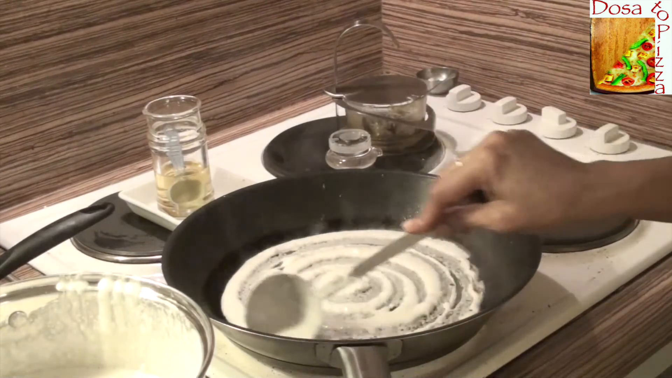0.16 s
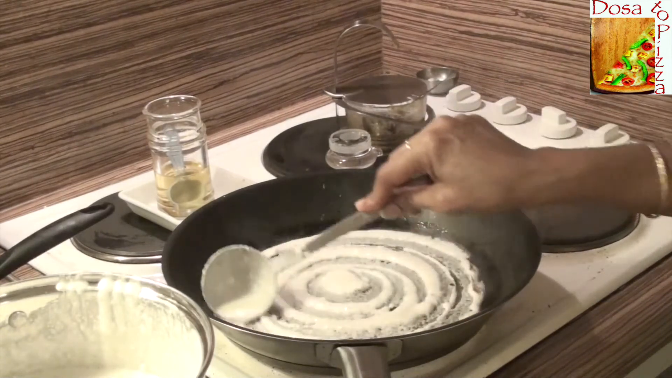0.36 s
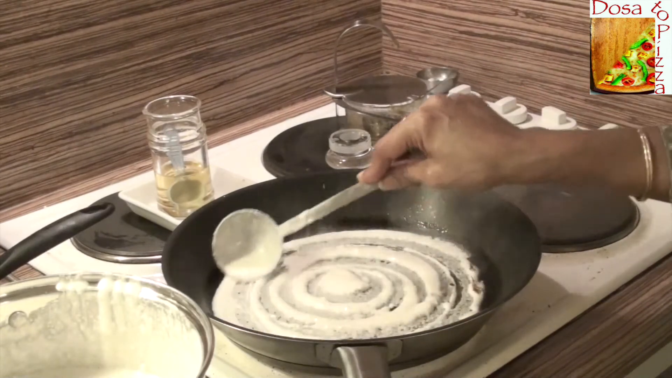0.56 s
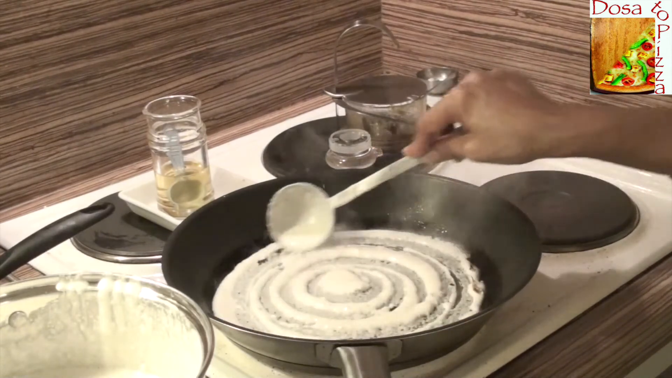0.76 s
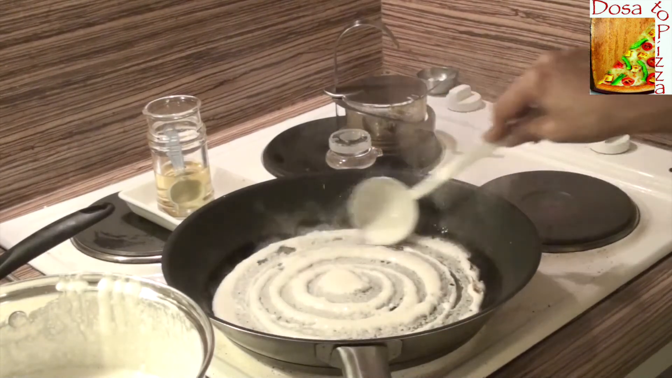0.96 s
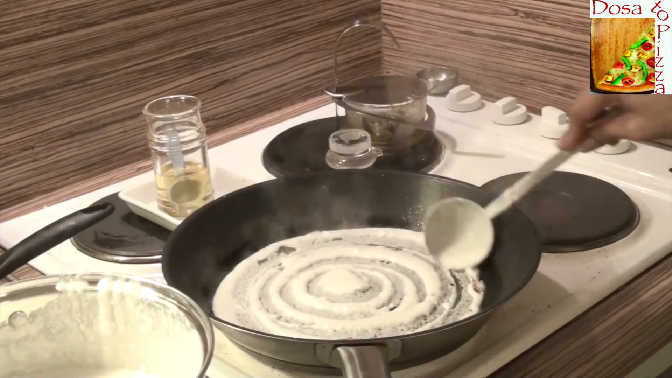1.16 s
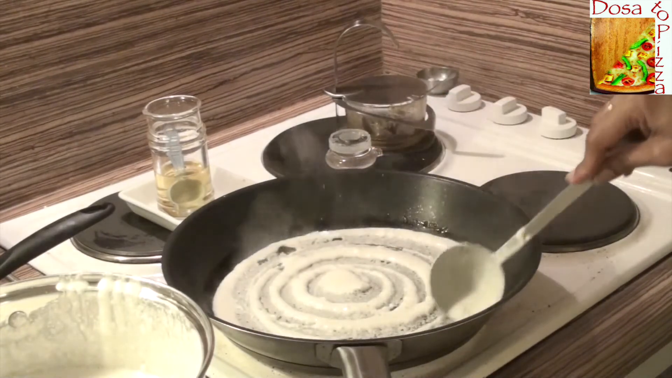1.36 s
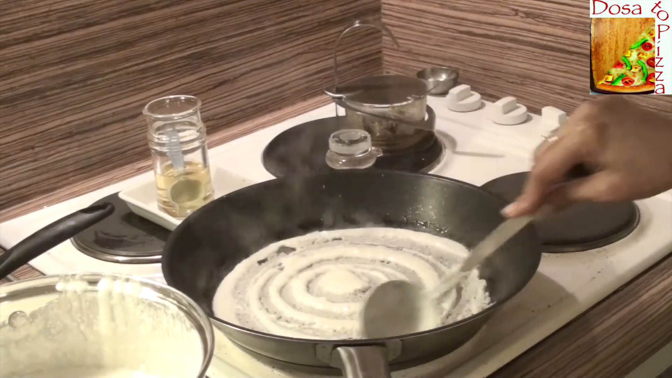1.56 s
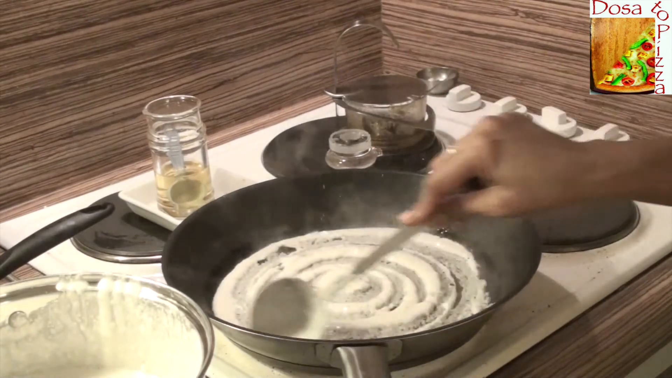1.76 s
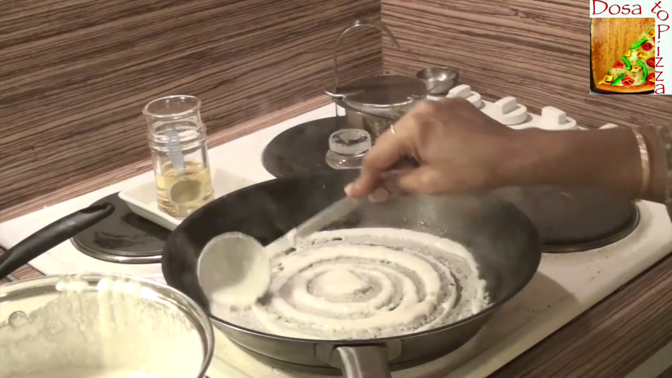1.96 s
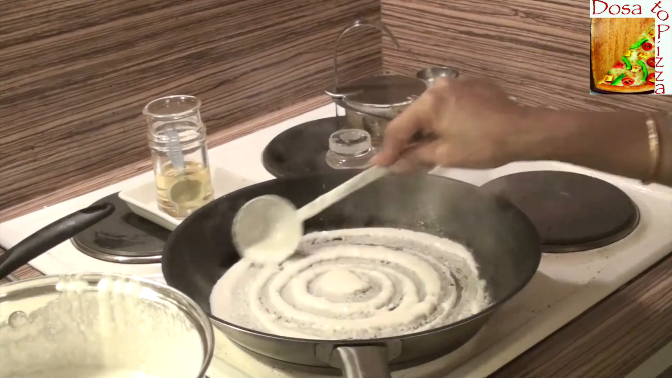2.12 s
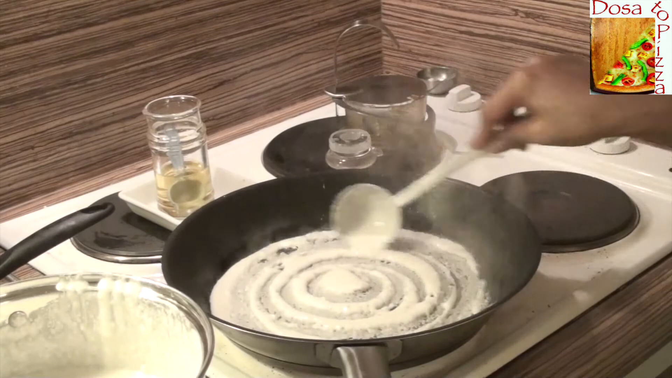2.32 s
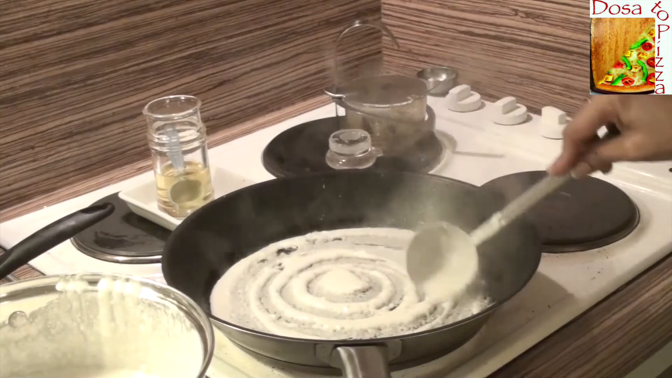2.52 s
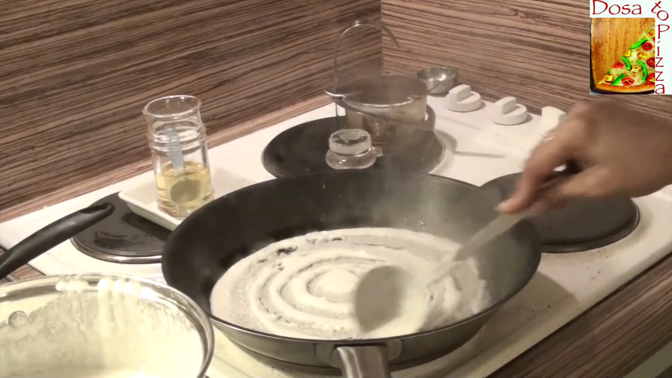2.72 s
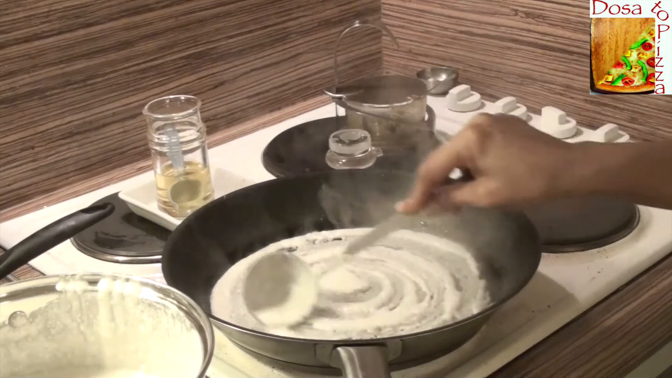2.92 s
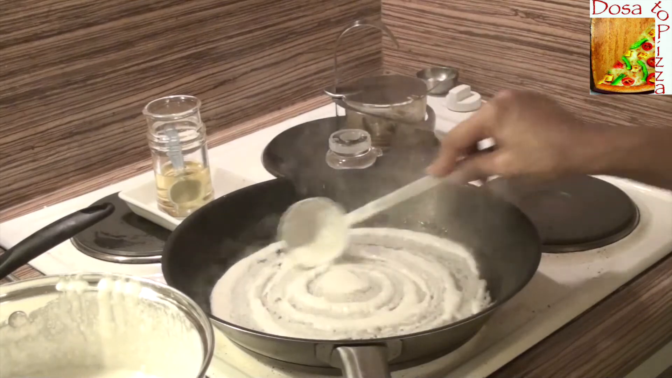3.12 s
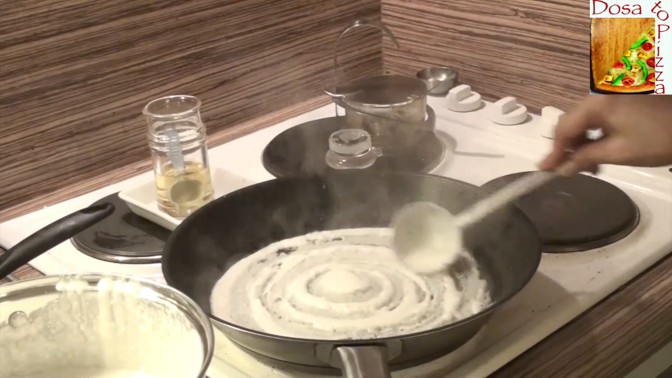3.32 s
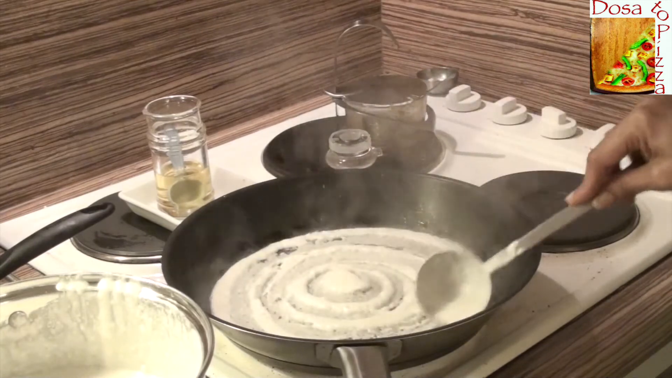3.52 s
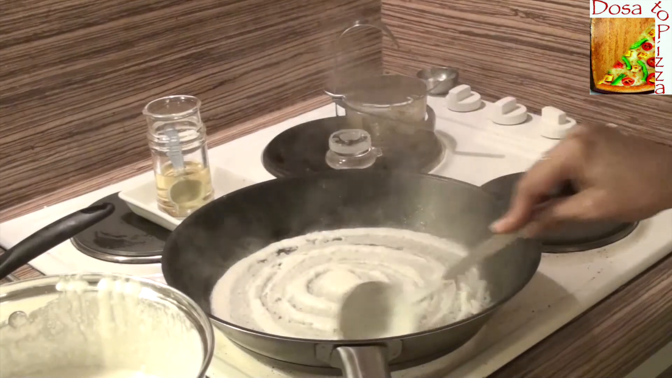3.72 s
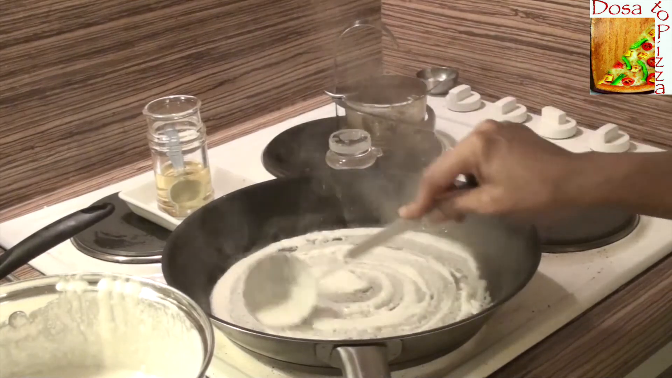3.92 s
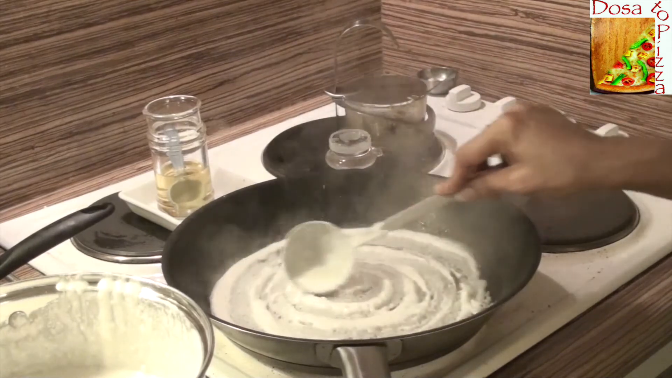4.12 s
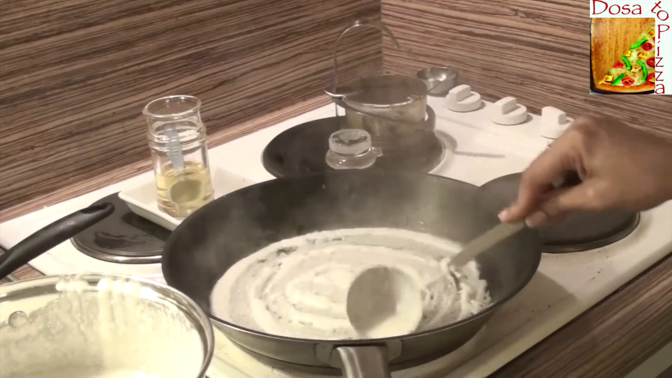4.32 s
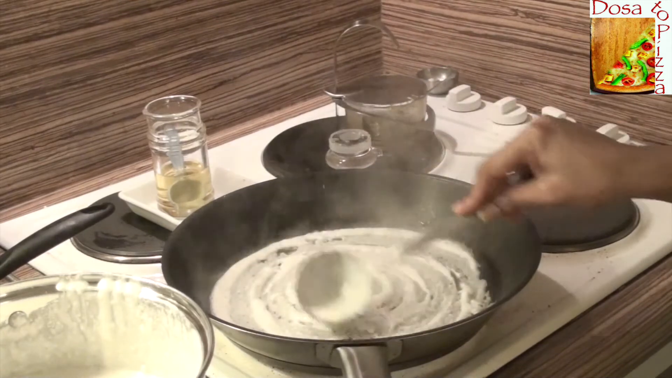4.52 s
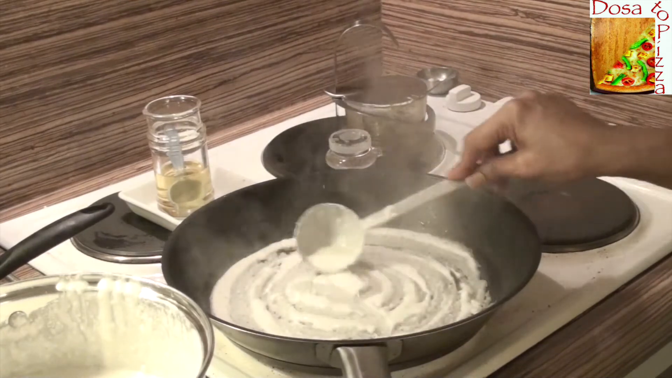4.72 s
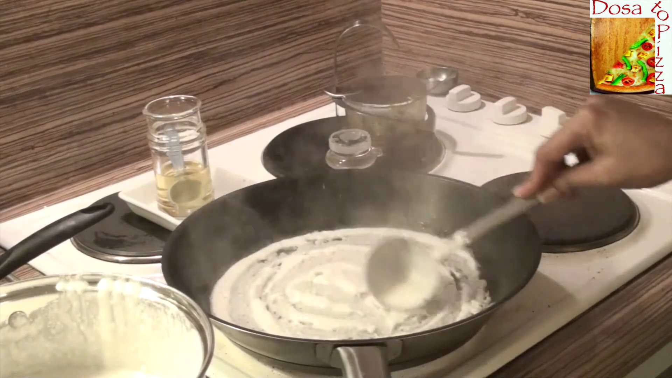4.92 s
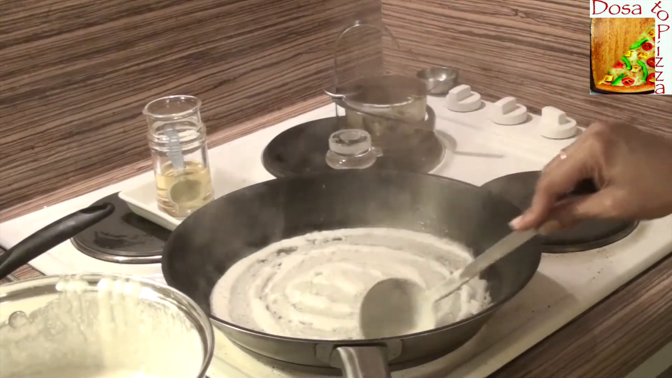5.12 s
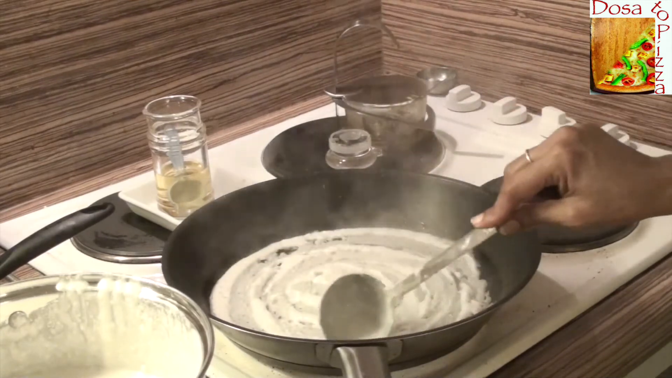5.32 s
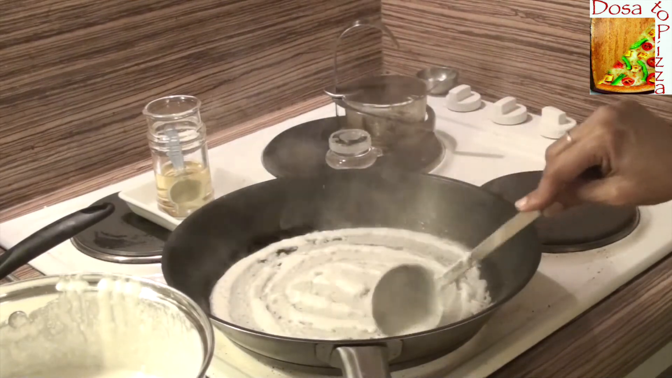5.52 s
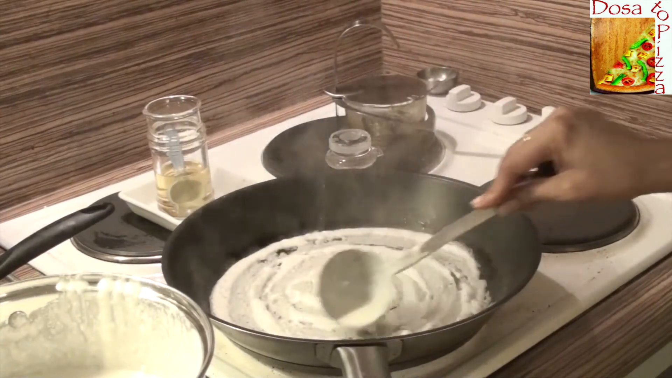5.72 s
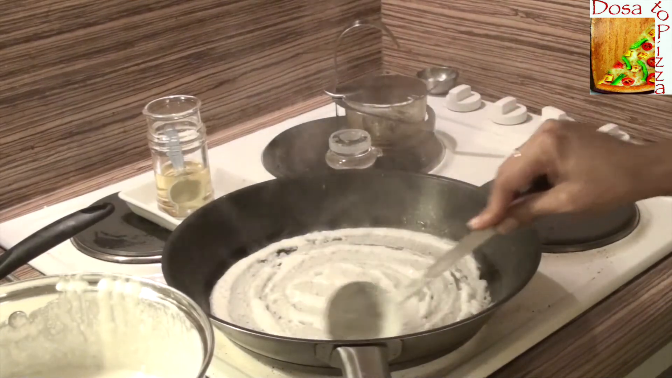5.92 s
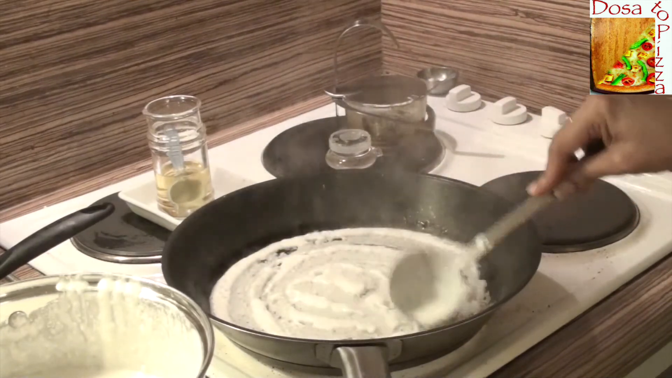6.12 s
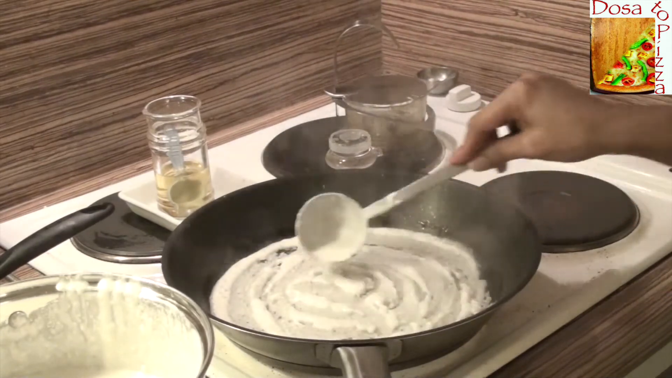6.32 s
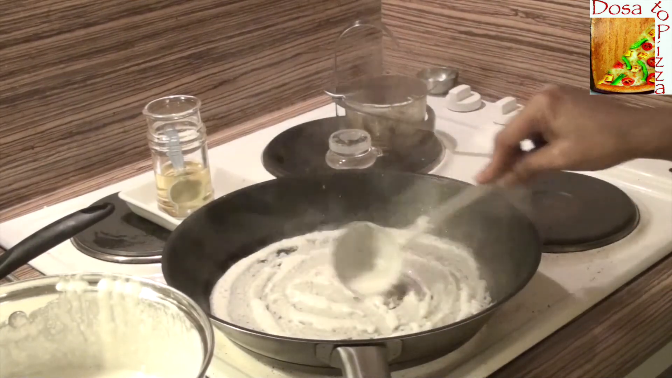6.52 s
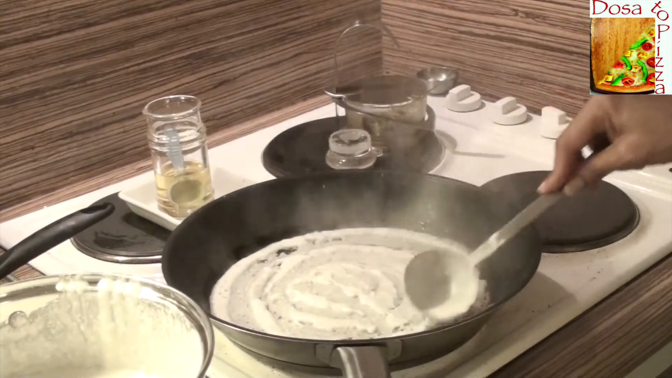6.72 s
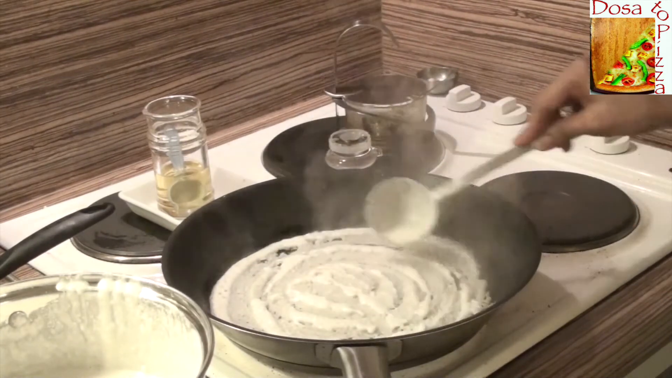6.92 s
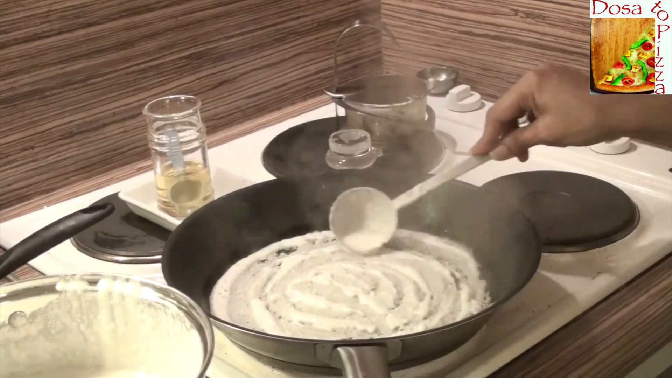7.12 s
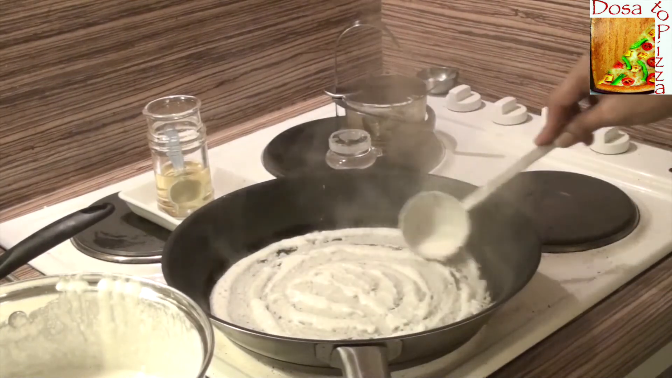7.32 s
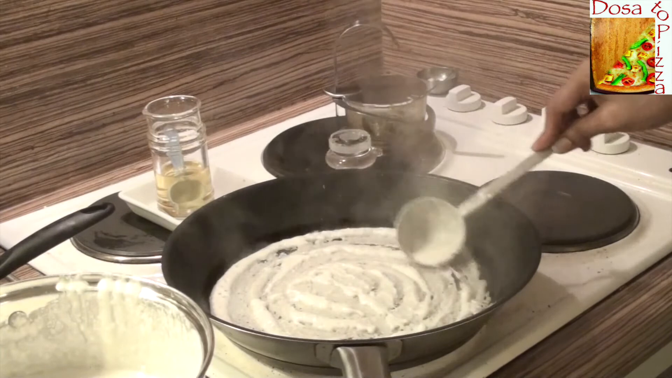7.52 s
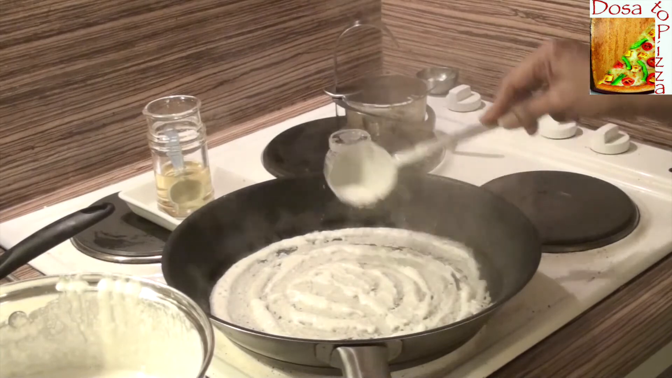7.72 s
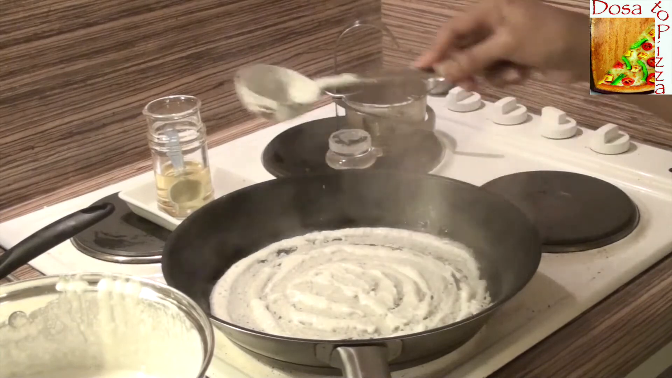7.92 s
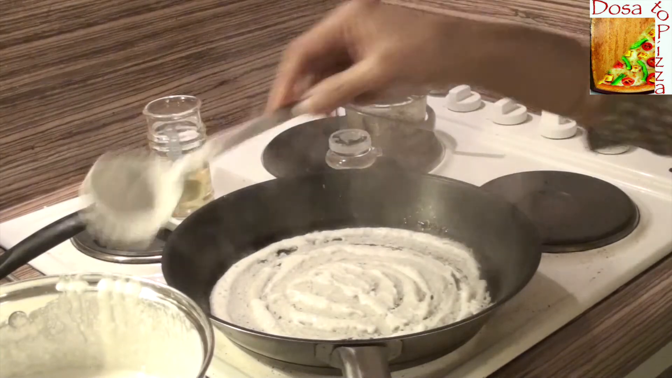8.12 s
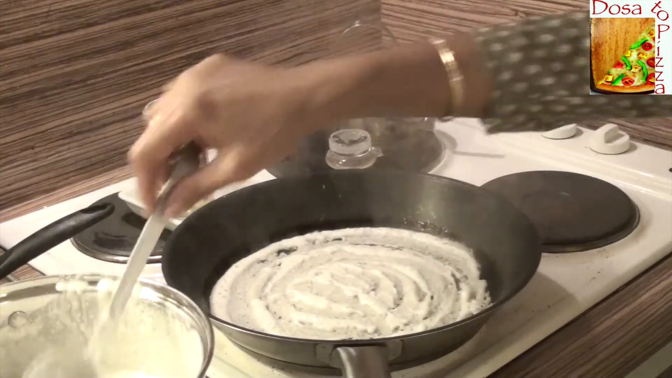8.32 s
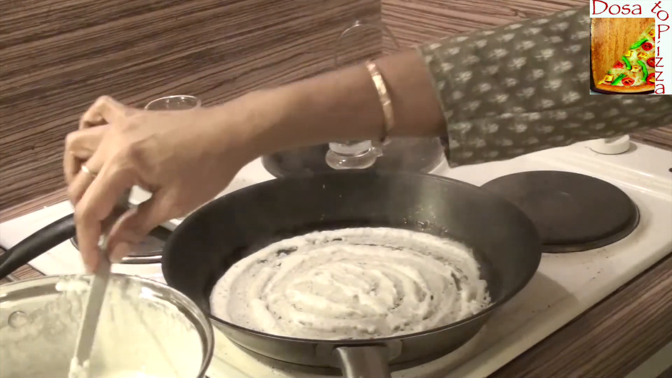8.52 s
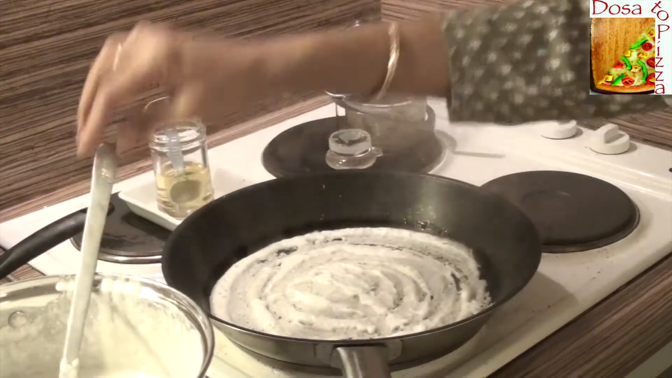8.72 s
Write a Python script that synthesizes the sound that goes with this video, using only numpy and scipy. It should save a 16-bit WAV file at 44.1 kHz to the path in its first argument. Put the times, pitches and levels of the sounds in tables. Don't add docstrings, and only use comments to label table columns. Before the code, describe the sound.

From 0 seconds, thin batter on a hot pan gives a dense, bright, steady hiss of bursting steam bubbles, heard close and central in a small kitchen. It stays strong until about 2.5 seconds, when it begins to drop and clear snapping spits emerge; an especially sharp pop comes at about 3.1, another strong one near 3.9. By 5 seconds the hiss is much thinner, flickering, with frequent crisp pops, short splutters and tiny droplet ticks. From 6.5 to 8.5 it is a faint, dry crackle with small spits. Low air rumble, a very quiet motor hum and fan tone lie beneath, with occasional soft, dull counter thumps, including near 2.25 and 6. At about 8.65 a ladle clanks brightly against a steel bowl slightly left, followed by three quick, weaker rattles and a short metallic ring.

```python
import sys
import numpy as np
from scipy import signal
from scipy.fft import rfft, irfft, next_fast_len
from scipy.io import wavfile
from scipy.ndimage import uniform_filter1d, map_coordinates

SR = 44100
rng = np.random.default_rng(int(sys.argv[2]) if len(sys.argv) > 2 else 0)


def to_wav(sig):
    pcm = np.clip(np.atleast_2d(sig), -1, 1) * 32767
    pcm = np.round(pcm).astype(np.int16)
    wavfile.write(sys.argv[1], SR, pcm.T)


def makeup_ratio(level_db):
    decades = np.asarray(level_db, float) / 20
    return 10 ** decades


N = 386227

# (time [s], level [dB])
BOIL = [(0.0, -22.5), (0.48, -23.5), (1.1, -23), (2.66, -25.5), (4.66, -33.5), (4.88, -36.5), (5.26, -33.5),
        (5.6, -37), (6.01, -36), (6.66, -39.5), (6.85, -44), (7.04, -42), (7.24, -39.5), (7.91, -43.5),
        (8.32, -42.5), (8.46, -43.5), (8.63, -49)]
# (frequency [Hz], level per Hz [dB])
FIZZ = [(500, -25), (900, -4), (1450, -7), (1700, 1), (2500, 1.5), (3200, 1), (5000, 3.5), (7800, 4),
        (8800, 1), (11800, 0.5), (13000, -3.5), (15900, -7.5)]
# (frequency [Hz], level per Hz [dB])
BUBBLES = [(200, -47), (350, -10.5), (450, -10.5), (580, 1.5), (750, -4.5), (1000, -4), (1400, 3),
           (2000, 3), (3000, 5.5), (5000, -0.5), (9000, -34)]
# (time [s], peak [dB], pitch [Hz], splutter after it [dB])
CLEAR_SPITS = [(2.4987, -9.5, 5090, -12), (2.6512, -12, 4240, -9.5), (2.68, -12, 4730, -13),
               (2.873, -40, 7140, 13), (2.929, -21, 4350, -0.5), (3.1115, 10, 4530, -37),
               (3.1837, -15, 8100, -7), (3.3267, -4, 5590, -20), (3.4057, -15, 10200, -6.5),
               (3.5069, -17, 8020, -25), (3.5828, -25, 7990, -23), (3.6236, -20, 3650, -14),
               (3.7653, -37, 4290, 2), (3.8333, -20, 4630, -5.5), (3.898, 3.5, 5140, -25.5),
               (4.055, -20, 5060, -14), (4.122, -18, 7290, -6), (4.27, -23.5, 5700, -5.5),
               (4.426, -20, 5300, -8), (4.4767, -18, 8770, -10.5), (4.5824, -32, 9320, 0),
               (4.613, -22.5, 3300, -3.5), (4.6935, -19.5, 5550, -3), (4.7802, -9, 6620, -19.5),
               (4.8668, -24.5, 3160, -6.5), (4.9501, -32, 5200, -0.5),
               (5.032, -20.5, 5150, -8), (5.0468, -13, 7500, -11), (5.1166, -13.5, 5300, -14.5),
                 (5.1416, -21.5, 7500, 2.5), (5.2665, -27, 5330, -9), (5.2782, -13.5, 11000, -12),
                 (5.375, -6, 6400, -22), (5.4079, -16.5, 5250, -16), (5.4503, -32, 8210, -19),
                 (5.4755, -36, 6210, 0), (5.4917, -20, 7920, -2.5), (5.588, -24.5, 2850, -11.5),
                 (5.6733, -20, 7750, -18), (5.722, -13, 11600, -21), (5.7451, -24, 2760, -8),
                 (5.7786, -18, 7070, -14), (5.816, -23, 5410, -15), (5.85, -15, 10800, -13),
                 (5.8938, -26.5, 4470, -3.5), (5.9472, -26, 9570, -14), (5.9622, -15, 4900, -11.5),
                 (6.0852, -28, 7600, -1), (6.1345, -26.5, 7590, -4), (6.2042, -18.5, 5550, -12.5),
                 (6.267, -21, 6350, -8.5), (6.377, -27, 4520, -4), (6.4714, -15, 6910, -14),
                 (6.535, -37, 3970, -11), (6.55, -18, 4040, -13), (6.589, -24, 5180, -13),
               (6.6303, -25, 7140, -12), (6.6685, -22.5, 5160, -6), (6.7171, -26.5, 8000, 0.5),
             (6.7863, -29.5, 2860, -9), (6.8482, -21.5, 7070, -10), (6.92, -15.5, 5700, -19),
             (6.968, -30, 8100, -11), (7.0119, -29, 11200, -6), (7.0453, -23, 5050, -12.5),
             (7.0836, -17.5, 7600, -13), (7.112, -22.5, 7900, -3.5), (7.1628, -15.5, 7470, -16.5),
             (7.2414, -13, 5850, -14), (7.2904, -26.5, 3170, -8.5), (7.3504, -22.5, 8110, -8.5),
             (7.382, -20, 6420, -12), (7.427, -25, 7500, -2.5), (7.663, -20.5, 7100, -14.5),
             (7.7075, -32.5, 3960, -3), (7.7519, -22.5, 7870, -4), (7.8674, -11, 10600, -12.5),
             (7.977, -30.5, 3870, -13), (8.0897, -37, 6900, -1), (8.159, -16.5, 6150, -12),
             (8.2004, -24, 6700, -8.5), (8.477, -25, 11800, -15), (8.5756, -33, 8020, -12),
             (8.6197, -28.5, 9030, -10)]
# (frequency [Hz], level per Hz [dB])
AIR = [(15, -32), (25, -5), (59, -6), (98, -0.5), (137, -1), (485, 2), (547, 3), (958, -3), (1240, 0),
       (1460, -6), (3000, -22), (3900, -39), (6600, -120)]
# (time [s], level [dB], pitch [Hz], time to fall 60 dB [s])
THUMPS = [
    (1.58, -49, 132, 0.6),
    (1.79, -46, 110, 0.22),
    (2.25, -39, 400, 0.23),
    (5.33, -53, 280, 0.29),
    (5.94, -43, 108, 0.3),
    (6.05, -46, 587, 0.7),
    (7.24, -58, 110, 0.27),
    (7.46, -49, 168, 0.63),
    (7.55, -61, 550, .9),
    (8.66, -50, 90, 0.65),
]
# (time [s], level [dB])
LADLE = [
    (8.6465, -15.5),
    (8.691, -23),
    (8.715, -24.5),
    (8.736, -26.5),
]
# (frequency [Hz], level per Hz [dB])
CRASH = [(100, -26), (350, -4), (700, 0), (1400, -4.5), (2500, -8), (5200, -4), (8000, -17), (12000, -20),
         (16000, -27)]
# (centre [Hz], width [Hz], level [dB])
CLANG = [(1070, 82, -7), (2020, 76, -2), (3310, 75, 3), (3580, 24, -19), (3960, 57, -10), (4290, 23, -16),
         (4670, 130, -5), (5430, 180, -0.5), (6500, 46, 3), (7600, 200, 1), (9150, 270, -1.5),
         (10560, 52, -4), (11600, 150, -3)]
# (pitch [Hz], level [dB], time to fall 60 dB [s])
BOWL = [(393, -14, .3), (675, -9, .4), (988, -15, .3), (1123, -7, .4), (1373, -14, .4), (1443, -15, .4),
        (2023, -16, .9), (3193, -3, .3), (3248, 2.5, .25), (3281, -5, .2), (3541, -11, .3), (3886, -15, .7),
        (3966, -11, .6), (4283, -7, .2), (4691, -15, .4), (5160, -13, .2), (5556, -19, .6), (6530, -13, .3),
        (7020, -17, .3), (7610, -13, .35), (7725, -14, .3), (8166, -14, .2), (8737, -15, .2),
        (8964, -12, .15), (9007, -12, .15), (9254, -16, .2), (10340, -20, .2), (11700, -20, .2)]
# (delay [s], level [dB])
WALLS = [
    (0.0094, -42),
    (0.0063, -109),
]
# (frequency [Hz], time to fall 60 dB [s])
KITCHEN = [(200, 1), (1500, 0.32), (6000, 0.14), (15000, 0.26)]
# (frequency [Hz], side against middle [dB])
WIDTH = [(60, -26), (120, -16), (250, -10.5), (600, -14), (1500, -12), (2500, -21.5), (4500, -22.5),
         (7500, -18), (9400, -20), (9700, -18), (10300, -8), (11100, -11.5), (11600, -16.5)]

FIZZ_DB, BUBBLE_DB, BUBBLE_FADES = -2.15, -31, 1.54
POP_DB, LEAD_S = 8, .0013
SMALL_PER_S, SMALL_DB, SMALL_SPREAD_DB, SMALL_HZ, SMALL_OCTAVES = 16, 9, 3, 5600, 1
SMALL_GROWS_DB = .8
TICKS_PER_S, TICK_DB, TICK_HZ = 30, 10.5, 6000
HUM_HZ, BEAT_HZ, BEAT_NULL = 49.15, 0.078, 4.87
WHINE_HZ, WHINE_DB = 550, -66
TOP_HZ, CEILING = 16050, .95


def unit(x):
    return x / np.sqrt(np.mean(x ** 2) + 1e-20)


def along(points, hz):
    f, v = np.transpose(points)
    return np.interp(np.log(hz + 1), np.log(f + 1), v)


def wobble(rate):
    knots = rng.standard_normal(int(N * rate / SR) + 4)
    return map_coordinates(knots, [np.arange(N) * rate / SR])


def filtered(x, response):
    m = next_fast_len(x.shape[-1] + 8192)
    spectrum = rfft(x, m) * response(np.fft.rfftfreq(m, 1 / SR))
    return irfft(spectrum, m)[..., :x.shape[-1]]


def resonance(hz, sharp):
    return lambda f: 1j * f * hz / sharp / (hz * hz - f * f + 1j * f * hz / sharp)


def pops(count, rate, spread_db):
    when, size, sign = rng.random((3, count))
    height = makeup_ratio(-spread_db * np.log(1 - .96 * size))
    return (when < rate / SR) * height * np.sign(sign - .3)


def boil_db(t):
    return np.interp(t, *np.transpose(BOIL))


def froth(spectrum, rate, spread_db, sharp, hiss):
    low, high = spectrum[1][0], spectrum[-2][0]
    rings = []
    for pitch in np.geomspace(low, high, num=9):
        ring = unit(filtered(pops(N, rate, spread_db), resonance(pitch, sharp)))
        rings.append(ring * np.sqrt(pitch))
    mix = unit(sum(rings)) + hiss * rng.standard_normal(N)
    hz, power = signal.welch(mix, SR, nperseg=128)
    return unit(filtered(mix, lambda f: makeup_ratio(along(spectrum, f)) / np.sqrt(np.interp(f, hz, power))))


def sizzle():
    t = np.arange(N) / SR
    dry = .4 + .1 * t
    flicker = wobble(16)
    fizz_db = dry * (.6 * flicker + 1.0 * wobble(35))
    bubble_db = dry * (0.39 * flicker + 0.19 * wobble(25))
    fizz = froth(FIZZ, rate=420, spread_db=1.0, sharp=1.3, hiss=1.0) * makeup_ratio(fizz_db)
    bubbles = froth(BUBBLES, rate=150, spread_db=1.0, sharp=2.0, hiss=1.0) * makeup_ratio(bubble_db)
    bubble_level = makeup_ratio(BUBBLE_DB + BUBBLE_FADES * (boil_db(t) - boil_db(1)))
    return makeup_ratio(boil_db(t) + FIZZ_DB) * fizz + bubble_level * bubbles


def small_spits():
    draw = rng.random((round(SMALL_PER_S * N / SR), 4))
    s = draw[:, 0] * BOIL[-1][0]
    scatter_db = -SMALL_SPREAD_DB * np.log(1 - .95 * draw[:, 1])
    db = boil_db(s) + SMALL_DB + SMALL_GROWS_DB * (s - 6) + scatter_db
    hz = SMALL_HZ * 2 ** (SMALL_OCTAVES * (4 * draw[:, 2] - 2) / np.sqrt(3))
    return list(zip(s, db, hz, -21 + 12 * draw[:, 3]))


def spit(db, hz, tail_db):
    t = np.arange(SR // 8) / SR

    def push(f):
        return np.abs(resonance(hz, .8)(f)) + 0.21 * np.abs(resonance(hz / 4, 1)(f))

    def spike(f):
        return push(f) * np.exp(-2j * np.pi * f * 8 / SR)

    def tear(f):
        return (np.abs(spike(f)) + 0.2 * resonance(hz, 1.2)(f)) * np.exp(-2j * np.pi * f * LEAD_S)

    t60 = .11 * makeup_ratio(.4 * (tail_db + 11))
    fade = makeup_ratio(-60 * t / t60) + .8 * makeup_ratio(-60 * t / 0.053)
    burst = unit(pops(len(t), 1500, 4.7)) + 0.56 * rng.standard_normal(len(t))
    burst = unit(burst) * makeup_ratio(tail_db) * fade * (1 - np.exp(-t / 0.001))
    burst = unit(filtered(burst, spike)) * np.std(burst)
    pop = filtered(1. * (t == 0), tear)
    return min(makeup_ratio(db - 4.5), .36) * pop / pop.max() + makeup_ratio(db - 11) * burst


def spits():
    out = np.zeros(N + SR)
    for s, level_db, hz, tail_db in [*CLEAR_SPITS, *small_spits()]:
        sound = spit(level_db + POP_DB, hz, tail_db)
        out[round(s * SR):][:len(sound)] += sound
    return filtered(out[:N], lambda f: f ** 2 / (600 ** 2 + f ** 2) / (1 + (f / 14000) ** 4))


def ticks():
    clicks = np.abs(pops(N, TICKS_PER_S, 2)) * makeup_ratio(boil_db(np.arange(N) / SR) + TICK_DB)
    return filtered(clicks, lambda f: 2 * np.abs(resonance(TICK_HZ, .6)(f)))


def kitchen_air():
    rumble = unit(filtered(rng.standard_normal(N), lambda f: makeup_ratio(along(AIR, f))))
    return rumble * makeup_ratio(-55.5 + 0.32 * wobble(3.5))


def motors():
    t = np.arange(N) / SR
    turn = 2 * np.pi * HUM_HZ * t
    beat = np.sin(np.pi * BEAT_HZ * (t - BEAT_NULL))
    return makeup_ratio(-54.0) * (beat * np.sin(turn) + .12 * np.cos(turn))


def fan():
    return makeup_ratio(WHINE_DB) * unit(filtered(rng.standard_normal(N), resonance(WHINE_HZ, 38)))


def thumps():
    t, out = np.arange(N) / SR, np.zeros(N)
    for s, db, hz, t60 in THUMPS:
        after = np.maximum(t - s, 0)
        body = unit(filtered(rng.standard_normal(N), resonance(hz, 2.0)))
        out += body * makeup_ratio(db - 60 * after / t60) * (1 - np.exp(-after / 0.015))
    return out


def ladle():
    out, t = np.zeros(N + SR), np.arange(SR // 4) / SR

    def crowd(f):
        return sum((-1) ** k * makeup_ratio(db) * resonance(hz, hz / width)(f)
                   for k, (hz, width, db) in enumerate(CLANG))

    for s, db in LADLE:
        crash = unit(filtered(rng.standard_normal(len(t)), lambda f: makeup_ratio(along(CRASH, f))))
        clang = .7 * unit(filtered(rng.standard_normal(len(t)), crowd)) + .6 * crash
        clang = clang * (makeup_ratio(-60 * t / 0.068) + makeup_ratio(-60 * t / 0.18))
        out[round(s * SR):][:len(t)] += makeup_ratio(db) * clang * (1 - np.exp(-t / 0.00027))
    ring = 0
    for hz, db, t60 in BOWL:
        ring = ring + makeup_ratio(db - 60 * t / t60) * np.sin(2 * np.pi * (hz * t + rng.random()))
    out[round(LADLE[0][0] * SR):][:len(t)] += makeup_ratio(-18.5) * ring * (1 - np.exp(-t / .001))
    return out[:N]


def ladle_side(mid):
    return mid * (np.arange(N) / SR > LADLE[0][0])


def tail(t60s):
    hz, t, z = signal.stft(rng.standard_normal(SR // 2), SR, nperseg=256)
    fade = makeup_ratio(-60 * t / along(t60s, hz)[:, None])
    answer = signal.istft(z * fade, SR, nperseg=256)[1]
    return answer / np.linalg.norm(answer)


def patchy(x, depth_db):
    hz, _, z = signal.stft(x, SR, nperseg=512)
    field = uniform_filter1d(rng.standard_normal(z.shape), size=14, axis=0)
    field = uniform_filter1d(field, size=16, axis=1)
    gain = makeup_ratio(along(depth_db, hz)[:, None] * unit(field))
    return signal.istft(z * gain, SR, nperseg=512)[1][:N]


def scene():
    boil = patchy(sizzle(), [(500, .6), (5000, .7)])
    tears = spits() + ticks()
    tears = tears + sum(makeup_ratio(db) * np.pad(tears, (round(s * SR), 0))[:N] for s, db in WALLS)
    background = kitchen_air() + motors() + fan() + thumps()
    near = boil + tears + ladle()
    room = signal.fftconvolve(np.pad(near, (300, 0)), tail(KITCHEN))[:N]
    mid = near + makeup_ratio(-12.5) * room + background
    scatter = signal.fftconvolve(mid, tail([(100, 0.43), (2000, 0.18), (12000, 0.036)]))[:N]
    side = filtered(scatter, lambda f: makeup_ratio(along(WIDTH, f)))
    side = patchy(side, [(1000, 0.77), (3000, 9), (10000, 4.4)])
    side = side + 0.013 * mid + 0.13 * ladle_side(mid)
    return np.array([mid + side, mid - side])


def roll_off(x):
    return signal.sosfilt(signal.butter(12, 17010, fs=SR, output="sos"), x)


def record(dry):
    rounded = dry / (1 + np.abs(dry / CEILING) ** 4) ** .25
    mix = filtered(rounded, lambda f: f < TOP_HZ)
    return roll_off(mix)


dry = scene()
out = record(dry)
to_wav(out)
```